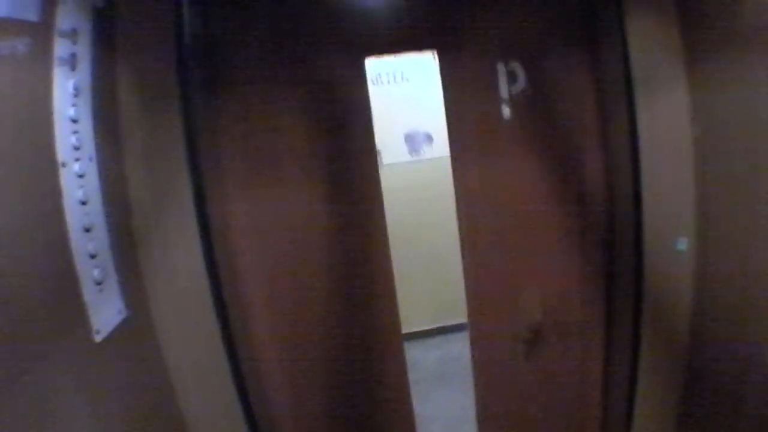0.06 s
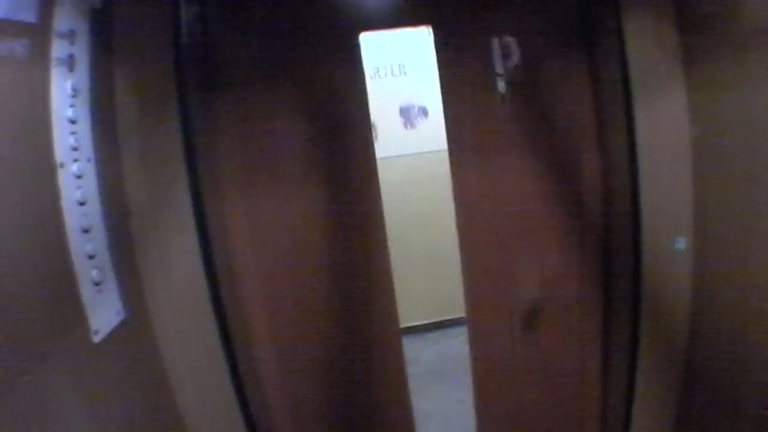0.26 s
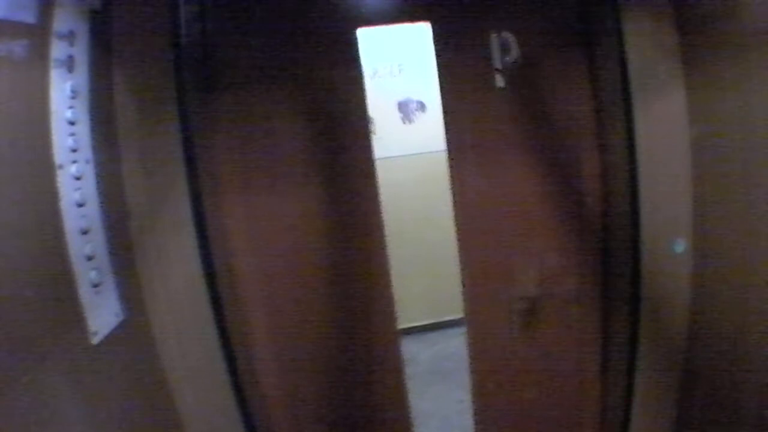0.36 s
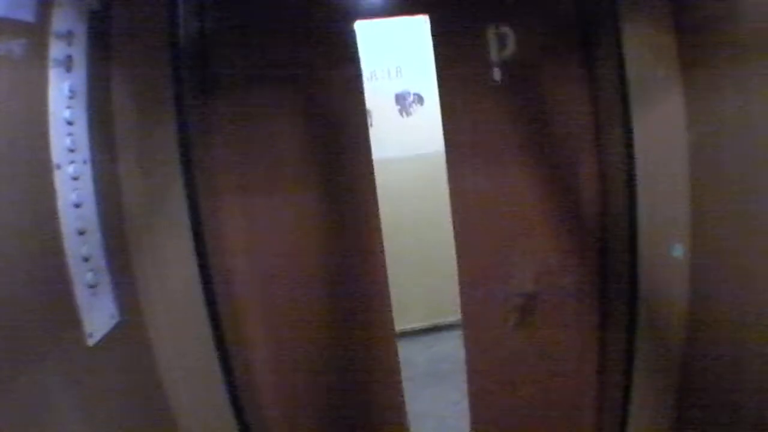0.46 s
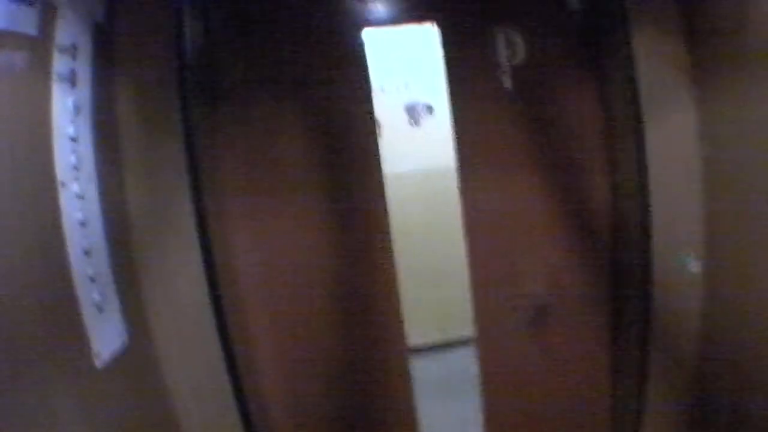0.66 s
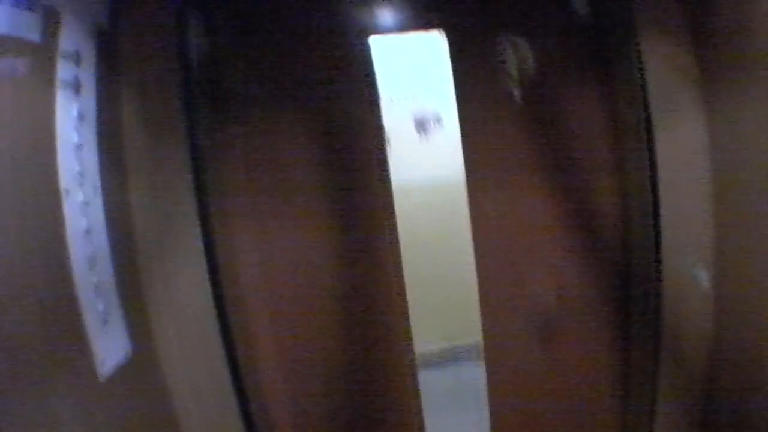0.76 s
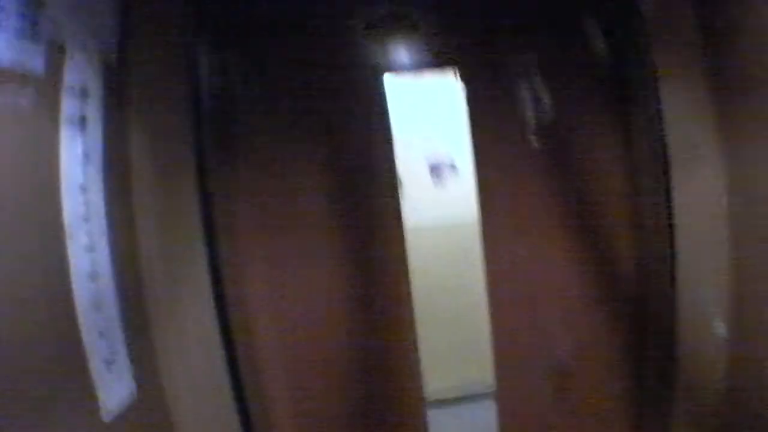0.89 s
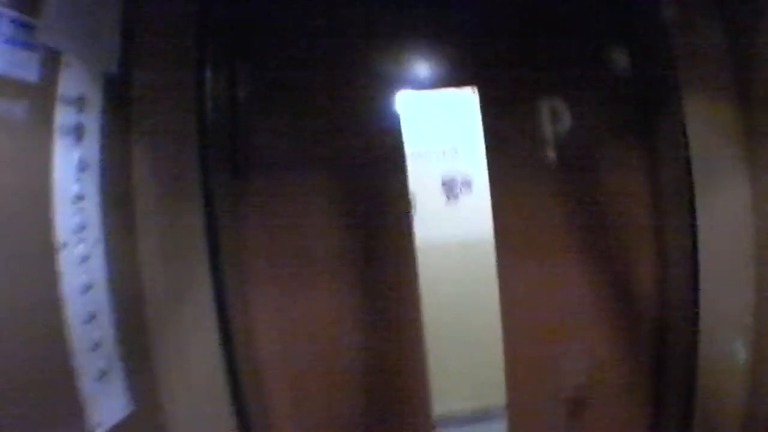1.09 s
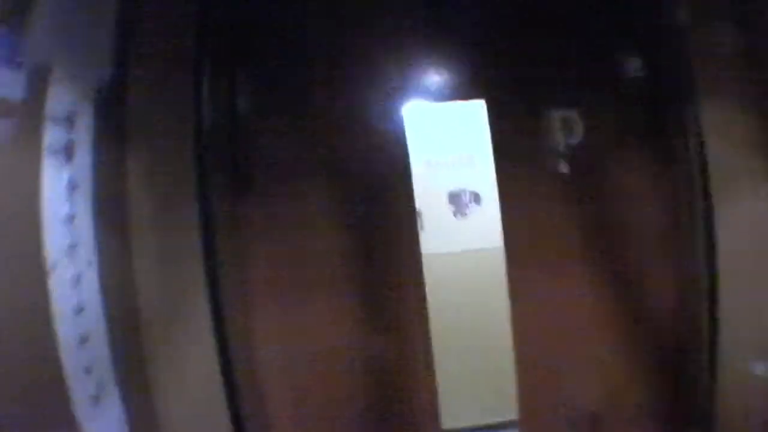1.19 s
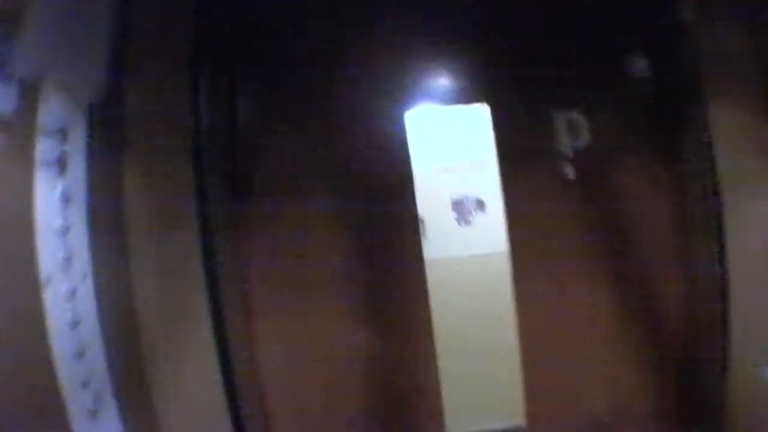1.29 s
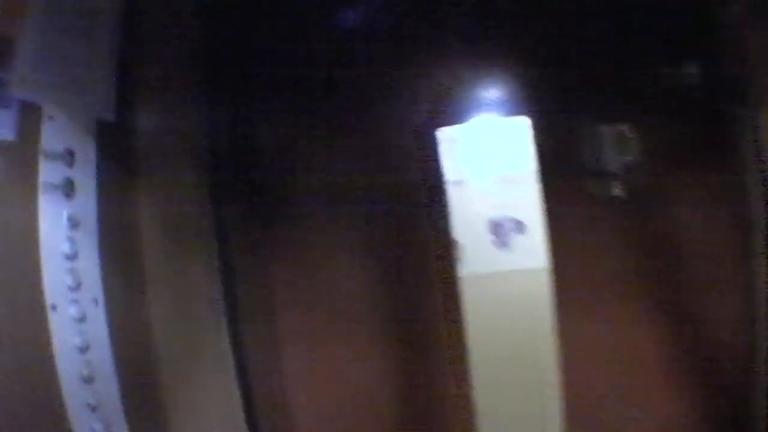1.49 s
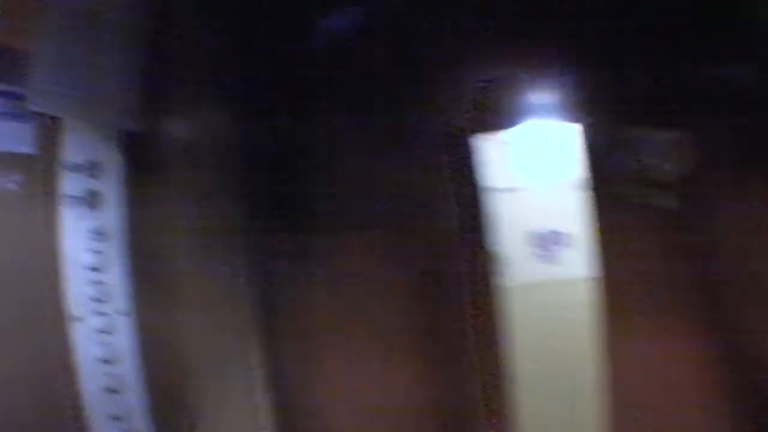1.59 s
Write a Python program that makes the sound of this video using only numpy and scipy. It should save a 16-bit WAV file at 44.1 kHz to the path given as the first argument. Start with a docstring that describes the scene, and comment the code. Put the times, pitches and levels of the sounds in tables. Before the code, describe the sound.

An old elevator's door lock and relays clack sharply in a quick cluster from about 0.2 to 0.4 seconds, thumping the panels and ringing briefly in the small cabin. A low, wavering hum and rumble swell at 0.5 seconds, then sag and settle by 1.1. A small click comes at 0.9, and another with a short scuffing rustle from 1.2 to 1.4, over faint hiss.

```python
"""A quick cluster of clacks opens the scene: the door lock and relays of an old lift.
They thump the door panels and ring the small cabin, whose close walls throw the sound back.
The drive takes up the load with a low, wavering hum that swells, sags and settles.
A small click and a short scuffing rustle follow, over the car's rumble and a faint hiss."""
import sys
import numpy as np
from scipy import signal
from scipy.fft import rfft, irfft, next_fast_len
from scipy.io import wavfile
from scipy.ndimage import uniform_filter1d

SR = 44100
rng = np.random.default_rng(int(sys.argv[2]) if len(sys.argv) > 2 else 0)


def store_pcm(level_fs):
    """Save levels as 16-bit WAV."""
    pcm = np.round(np.clip(level_fs, -1, 1) * 32767).astype(np.int16)
    wavfile.write(sys.argv[1], SR, np.atleast_2d(pcm).T)


N = 72765
BUILD_S = 0.0014  # rise time of anything struck


def clacks():
    """Lock and relays strike: each blow rings the door's modes and scatters into dense reflections."""
    # The blows. Each row: start in seconds, level in dB, low shelf in dB, top shelf in dB,
    # the part's own resonance in Hz, its lift in dB, opening crack in dB.
    blows = [(0.186, -43, 1.5, -5, 2820, 10, -14), (0.199, -30, -13, 7, 5400, 8, -5.5),
             (.2125, -26, 0.5, 11.5, 1320, 8, -4.5), (.253, -21, -6.5, 3, 2450, 2.5, -10),
             (0.334, -36.5, 3.5, 10.5, 9200, 8.5, -34), (.391, -23.5, -1, 7.5, 2805, 9.5, -4.5),
             (.4, -25.5, 3, -2.5, 5500, 8.5, -2), (.421, -37, 7, -26, 793, 6, -4),
             (.923, -35.5, -12.5, 5.5, 1760, 11.5, 0), (1.065, -49, -14.5, -11, 3250, 9, -7),
             (1.207, -36, -20, -13, 2490, 8.5, 2)]
    # Tone of the reflections. Each row: frequency in Hz, relative level in dB.
    tone = [(30, -32), (55, 9.5), (90, 0), (200, -1.5), (275, -7), (380, 4.5), (600, -5.5), (1100, -4.5),
            (1700, -9.5), (2700, -8), (4000, -8), (5800, -14), (8000, -20.5), (12000, -32), (16000, -41)]
    # Their decay, longest in the low mids. Each row: frequency in Hz, seconds to fall 60 dB.
    decay = [(60, 0.39), (130, 1), (400, 1), (800, 0.5), (1800, 0.33), (5000, 0.23), (14000, 0.33)]
    # Modes of door and lock. Each row: pitch in Hz, relative level in dB, seconds to fall 60 dB.
    door_modes = [(438.6, 1, 0.68), (543.3, -8, 0.98), (636.4, -11, 0.93), (700, -9, 0.51),
                  (900, -13, 0.75), (1121, -7, 0.47), (1158, -5, 0.12), (1655, -5, 0.15),
                  (2556, -1.5, 0.25), (2625, 0.5, 0.15), (3030, -7.5, 0.099), (3220, -7, 0.26),
                  (4850, -7.5, 0.23), (6130, -8, 0.29)]
    reflections_per_s, diffuse_s, crack_s = 8000, 0.051, 0.007
    door_db, part_width = -11, 0.084  # width as a share of the part's pitch
    freqs, age = bins(), seconds()
    centres = np.geomspace(60, 15000, 9)
    bands = [np.interp(np.log(freqs + 1), np.log(centres), row) for row in np.eye(len(centres))]
    fades = [np.exp(-np.log(1000) * age / at(decay, hz)) for hz in centres]
    colour = at(tone, freqs)
    colour -= 10 * np.log10(np.mean(undb(colour) ** 2))
    early = np.exp(-age / diffuse_s)  # separate reflections blur into a wash
    modes = np.array([undb(door_db + db) * (ring(0, hz, t60) + 1j * ring(0, hz, t60, np.pi / 2))
                      for hz, db, t60 in door_modes])
    out = 0
    for start, db, low_db, top_db, part_hz, lift_db, crack_db in blows:
        echoes = np.sqrt(early) * specks(reflections_per_s) + np.sqrt(1 - early) * noise()
        spectrum = rfft(echoes, 2 * (len(freqs) - 1))
        tail = sum(irfft(spectrum * band)[:, :N] * fade for fade, band in zip(fades, bands))
        attack = (1 - np.exp(-age / BUILD_S)) * (1 + undb(crack_db) * np.exp(-age / crack_s))
        phases = np.exp(2j * np.pi * rng.random((2, len(door_modes))))
        blow = shape(tail * attack, colour) + (phases @ modes).real
        part_db = lift_db / (1 + ((freqs / part_hz - 1) / part_width) ** 2)
        out += delayed(undb(db) * shape(blow, shelves(low_db, top_db) + part_db), start)
    return out


def thumps():
    """Door panels and cabin are jolted and swing briefly."""
    # Dull thumps. Each row: start in seconds, pitch in Hz, level in dB, seconds to fall 60 dB.
    jolts = [(0.162, 110.5, -37, 0.37), (0.21, 133, -23.5, 0.39), (0.213, 195.7, -23.5, 0.44),
             (0.244, 172, -18.5, 0.29), (.285, 83.6, -25, 0.34), (.396, 59.5, -22, 0.14),
             (.403, 201, -27, 0.39), (0.404, 364.6, -30, 1), (0.456, 140.4, -33, 0.43),
             (0.526, 402.5, -27, 0.18), (0.921, 97, -33, 0.2)]
    return sum(undb(db) * ring(start, hz, t60) for start, hz, db, t60 in jolts)


def drive():
    """A wavering hum swells as the load is taken up, then sags, over the motor's steady note."""
    # Swell of the hum. Each row: time in seconds, level in dB.
    swell = [(0, -64), (.2, -49), (.48, -48), (.56, -33), (.65, -36), (.76, -44), (.9, -45), (1.1, -57.5),
             (1.35, -54), (1.65, -55.5)]
    hum_hz, sag_from_s, sag_hz_per_s = 108, 0.6, 15.46
    waver_share, flutter_db = 0.0557, 4
    motor_hz, motor_db = 54, -60
    pitch = hum_hz - sag_hz_per_s * np.maximum(seconds() - sag_from_s, 0)
    pitch *= 1 + waver_share * wander(25)
    hum = np.sin(2 * np.pi * np.cumsum(pitch) / SR) * undb(flutter_db * wander(22.27))
    motor = np.sin(2 * np.pi * motor_hz * seconds())
    return unit(hum) * fader(swell) + undb(motor_db) * unit(motor)


def scuffs():
    """Short rubs: grainy friction with a thin squeak, stirring a boom in the cabin."""
    # The rubs. Each row: start in seconds, length in seconds, then in dB: level, low shelf,
    # top shelf, squeak against friction, boom against friction.
    rubs = [(1.193, .014, -32.5, -12.5, -4, -20, -3.5), (1.218, 0.064, -34.5, 3, 0.5, -34, -22),
            (1.272, 0.023, -41, 5, -12, -18, 0), (1.289, 0.027, -32, -8, -3, 1.5, 1),
            (1.318, 0.045, -33.5, -4.5, -4, -6.5, -5.5)]
    # Tone of the friction. Each row: frequency in Hz, relative level in dB.
    tone = [(100, -24), (250, -19), (400, 4), (650, 1), (820, -4.5), (945, 4.5), (1080, -9.5), (1400, -8),
            (1800, -1), (2250, -0.5), (3000, -1.5), (4200, -1), (5500, -3), (7500, -7), (11500, -12.5),
            (15500, -9.5)]
    attack_s, release_s, grains_per_s, grain_share = 0.0072, 0.028, 1500, 0.24
    out = 0
    for start, length, db, low_db, top_db, squeak_db, boom_db in rubs:
        age = seconds() - start
        push = np.clip(age / attack_s, 0, 1) * np.exp(-np.maximum(age - length, 0) / release_s)
        grit = np.sqrt(grain_share) * specks(grains_per_s) + np.sqrt(1 - grain_share) * noise()
        squeak = resonate(noise(), hz=7120, width_hz=700)
        boom = resonate(grit, hz=397.6, width_hz=11.4)
        rub = coloured(grit, tone) + undb(squeak_db) * squeak + undb(boom_db) * boom
        out += undb(db) * shape(rub * push, shelves(low_db, top_db))
    return out


def cabin_rumble():
    """The car rumbles low, swelling along with the drive."""
    # Tone of the rumble. Each row: frequency in Hz, relative level in dB.
    tone = [(20, -30), (42, -1), (85, 0), (140, -11), (220, -15.5), (280, -19), (380, -5), (480, -9),
            (650, -22.5), (1200, -29.5), (3000, -54)]
    # Its swell. Each row: time in seconds, level in dB.
    swell = [(0, -61), (.18, -60), (.5, -38.5), (.75, -42.5), (1.0, -46), (1.15, -49), (1.42, -48.5),
             (1.65, -54.5)]
    return coloured(noise(), tone) * fader(swell)


def sliding_hiss():
    """Sliding and cloth make a faint, uneven, slightly gritty hiss."""
    # Tone of the hiss. Each row: frequency in Hz, relative level in dB.
    tone = [(300, -9.5), (800, -2), (1400, -1.5), (2500, 0.5), (4500, -1.5), (6500, -3.5), (9000, -6.5),
            (12000, -9.5), (16000, -6)]
    # Its swell. Each row: time in seconds, level in dB.
    swell = [(0, -86), (.18, -61), (.5, -47.5), (.62, -43), (.75, -43), (.88, -45), (1.05, -46.5),
             (1.17, -49), (1.42, -45), (1.5, -47.5), (1.58, -45.5), (1.65, -43.5)]
    grit = noise() + 0.36 * specks(per_s=990)
    return coloured(grit, tone) * fader(swell) * undb(0.38 * wander(39.28))


def walls(x):
    """The close walls throw back the sound above the bass and colour it finely."""
    # First echoes. Each row: delay in seconds, treble level in dB against the direct sound.
    echoes = [(.0037, -21), (.0069, -18.5), (0.0111, -16)]
    above_hz = 730
    bounce = shape(x, -10 * np.log10(1 + (above_hz / (bins() + 10)) ** 2))
    return x + sum(undb(db) * delayed(bounce, delay) for delay, db in echoes)


def ring(start, hz, t60, phase=0):
    """One struck mode: a sine that builds fast and falls 60 dB in t60 seconds."""
    age = np.maximum(seconds() - start, 0)
    envelope = np.exp(-np.log(1000) * age / t60) * (1 - np.exp(-age / BUILD_S))
    return np.sin(2 * np.pi * hz * age + phase) * envelope


def noise():
    """Unrelated noise for mid and side."""
    return rng.standard_normal((2, N))


def specks(per_s):
    """Random clicks for mid and side, rms 1."""
    return unit(noise() * (rng.random(N) < per_s / SR))


def wander(per_s):
    """Smooth random drift with a spread near 1."""
    hold = int(SR / per_s)
    steps = np.repeat(rng.standard_normal(N // hold + 1), hold)
    return 1.2 * uniform_filter1d(uniform_filter1d(steps, hold), hold)[:N]


def shape(x, db):
    """Minimum-phase filter with a gain in dB at each frequency of bins()."""
    size = 2 * (len(db) - 1)
    cepstrum = irfft(np.log(undb(db)), size)
    cepstrum[1:size // 2] *= 2
    cepstrum[size // 2 + 1:] = 0
    return irfft(rfft(x, size) * np.exp(rfft(cepstrum)), size)[..., :N]


def coloured(x, tone):
    """Filter by a (Hz, dB) curve, to rms 1."""
    return unit(shape(x, at(tone, bins())))


def resonate(x, hz, width_hz):
    """Filter by one steep resonance, to rms 1."""
    return unit(shape(x, -20 * np.log10(1 + ((bins() - hz) / width_hz) ** 2)))


def shelves(low_db, top_db):
    """Gain in dB of a low shelf at 1100 Hz and a top shelf at 7500 Hz."""
    return low_db / (1 + (bins() / 1100) ** 4) + top_db * (1 - 1 / (1 + (bins() / 7500) ** 4))


def delayed(x, delay_s):
    """Shift both channels later."""
    return np.pad(x, ((0, 0), (int(delay_s * SR), 0)))[:, :N]


def fader(points):
    """Gain along a (seconds, dB) curve."""
    return undb(np.interp(seconds(), *np.array(points, float).T))


def at(points, hz):
    """Read a curve on a log-frequency axis."""
    freqs, values = np.array(points, float).T
    return np.interp(np.log(np.maximum(hz, 1)), np.log(freqs), values)


def bins():
    """Frequencies in Hz on which filters are drawn."""
    return np.fft.rfftfreq(2 * next_fast_len(N // 2 + 4096, real=True), 1 / SR)


def seconds():
    """Time of each sample."""
    return np.arange(N) / SR


def undb(db):
    """Decibels to gain."""
    return 10 ** (np.asarray(db) / 20)


def unit(x):
    """Scale to rms 1."""
    return x / np.sqrt(np.mean(x ** 2) + 1e-18)


def scene():
    """All sources in the cabin: the bass sits in the centre, the treble spreads."""
    # Stereo width. Each row: frequency in Hz, side against mid in dB.
    width = [(60, -42), (150, -38), (400, -29), (800, -31), (1500, -23), (2800, -13), (5600, -5.5),
             (10000, -1), (16000, -4)]
    # Balance. Each row: frequency in Hz, left against right in dB.
    balance = [(200, 0.5), (1400, -0.81), (2800, -0.86), (6000, -2.4), (14000, -0.67)]
    # Lag of the left microphone. Each row: frequency in Hz, phase lag in radians.
    left_lag = [(50, -0.059), (500, 0.04), (2000, 0.25), (4500, 0.61), (9000, 0.82), (13000, 0.31),
                (16000, -.3)]
    mid, side = walls(clacks() + scuffs() + cabin_rumble() + sliding_hiss())
    mid = mid + thumps() + drive()
    side = shape(side, at(width, bins()))
    lag = at(left_lag, np.fft.rfftfreq(N, 1 / SR))
    left = irfft(rfft(mid + side) * np.exp(-1j * lag), N)
    lean_db = at(balance, bins()) / 2
    return np.array([shape(left, lean_db), shape(mid - side, -lean_db)])


def record(dry):
    """Each microphone adds its own hiss; the deepest bass and the very top are cut."""
    # Tone of the microphones' self-noise. Each row: frequency in Hz, relative level in dB.
    hiss_tone = [(30, -20), (100, 4), (250, -9.5), (420, 2), (800, -10.5), (1500, -8.5), (3000, -8.5),
                 (6000, -8), (10000, -12.5), (15000, -15.5)]
    hiss_db, low_cut_hz, top_cut_hz = -53.5, 31, 15800
    hiss = undb(hiss_db) * coloured(noise(), hiss_tone)
    low_cut = signal.butter(3, low_cut_hz, "high", fs=SR, output="sos")
    top_cut = signal.ellip(10, .2, 80, top_cut_hz, fs=SR, output="sos")
    return signal.sosfilt(top_cut, signal.sosfilt(low_cut, dry + hiss))


dry = scene()
out = record(dry)
store_pcm(out)
```